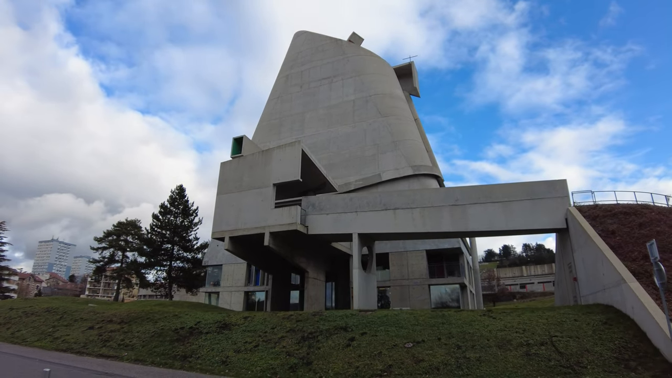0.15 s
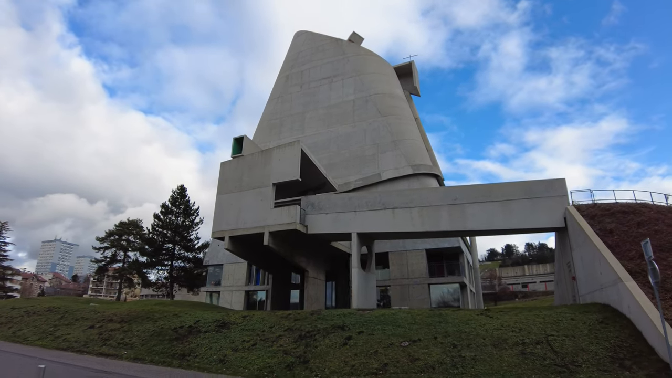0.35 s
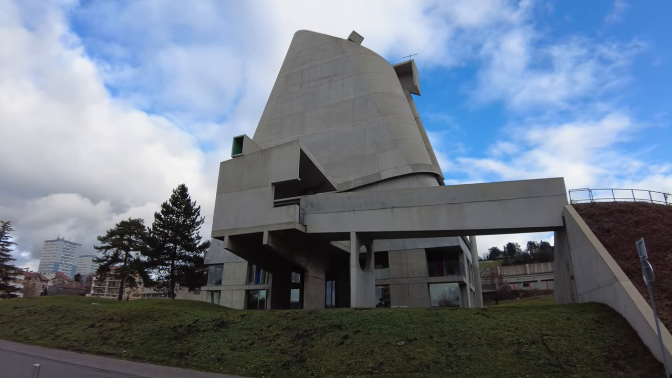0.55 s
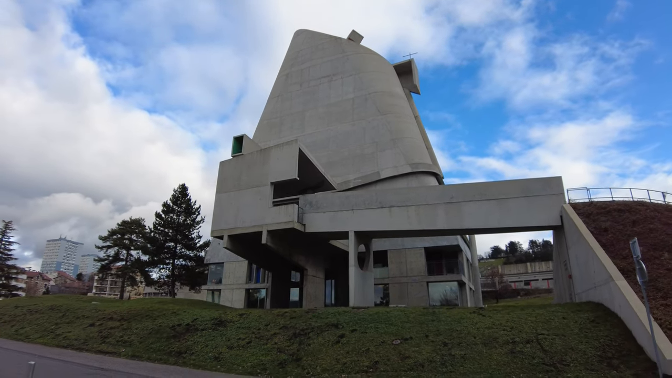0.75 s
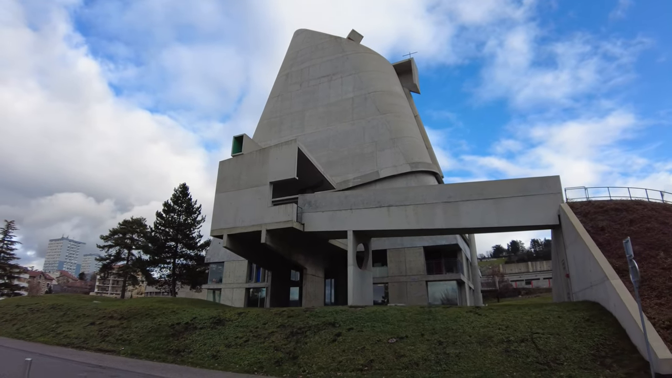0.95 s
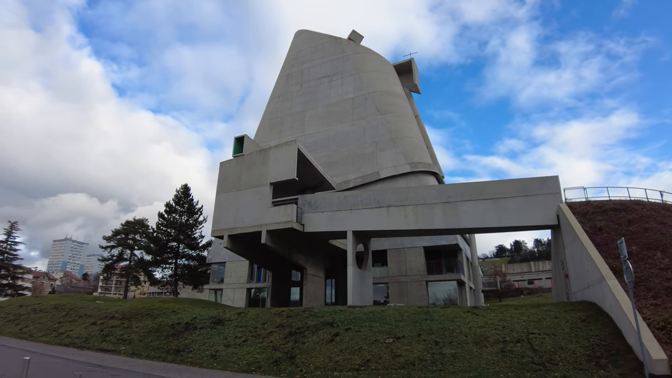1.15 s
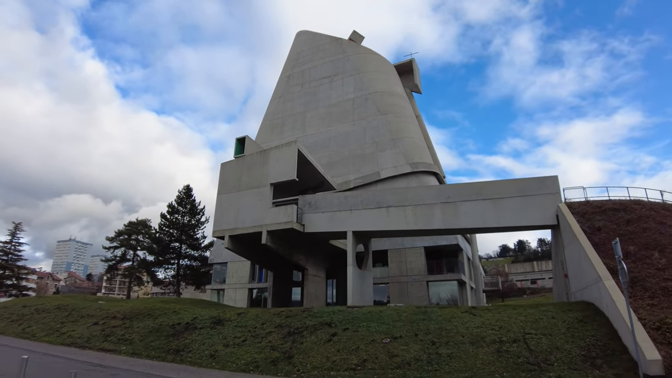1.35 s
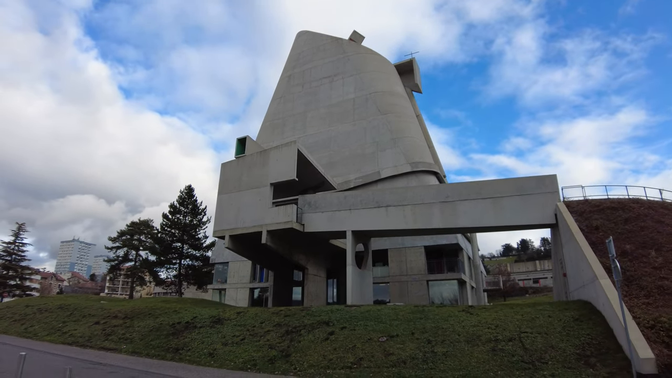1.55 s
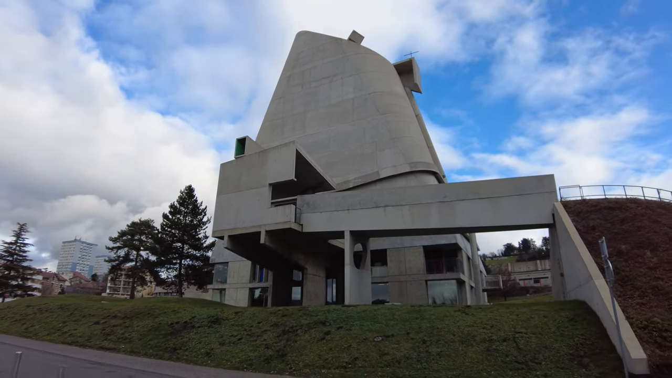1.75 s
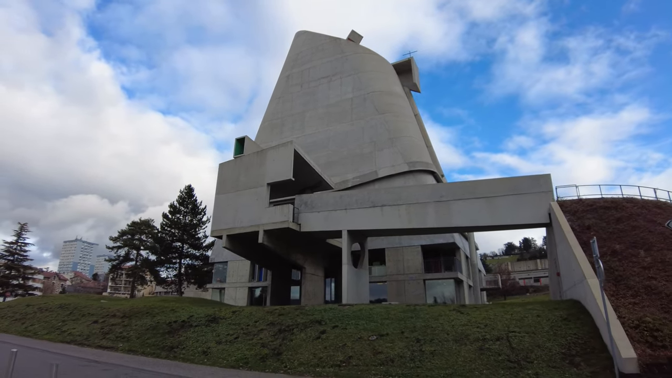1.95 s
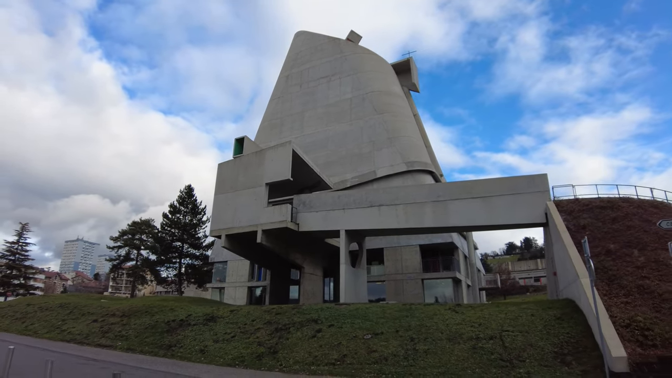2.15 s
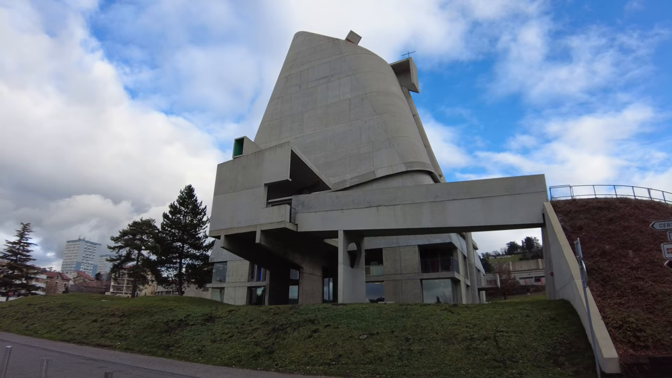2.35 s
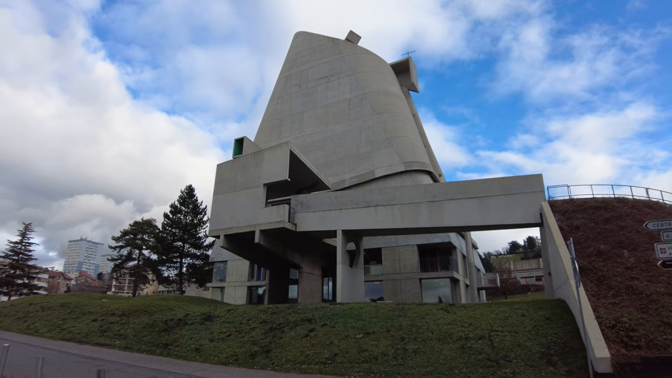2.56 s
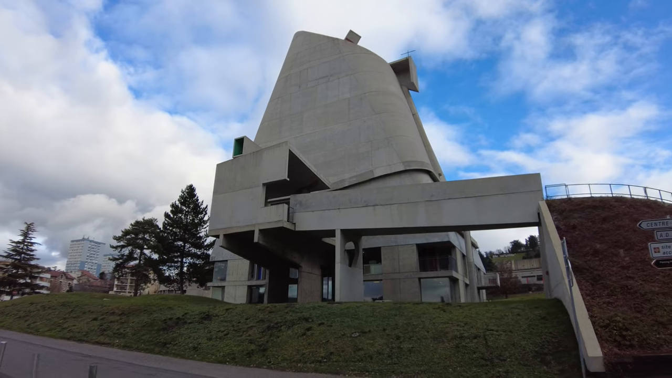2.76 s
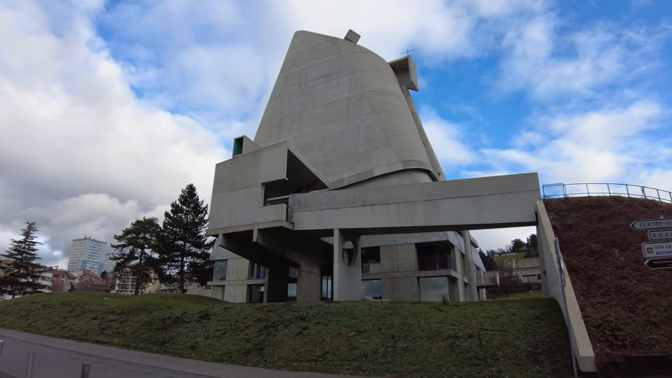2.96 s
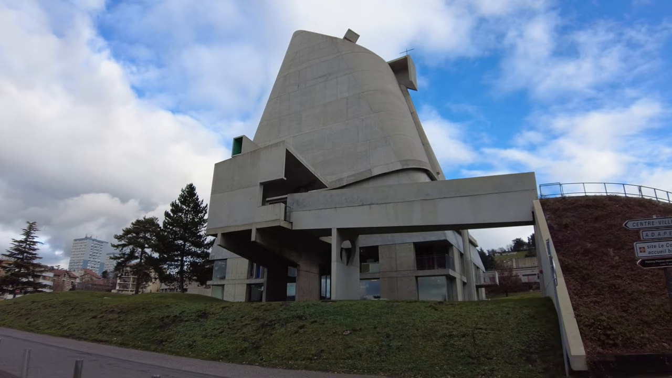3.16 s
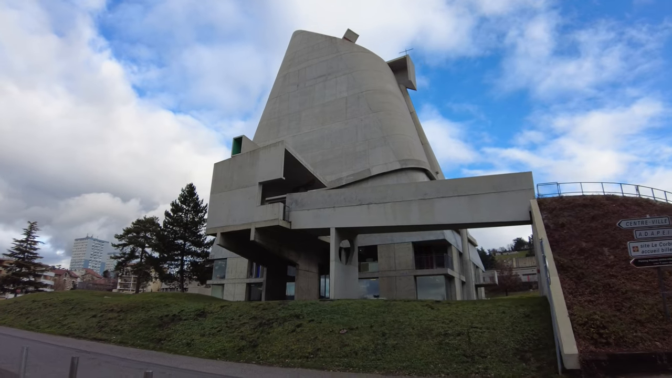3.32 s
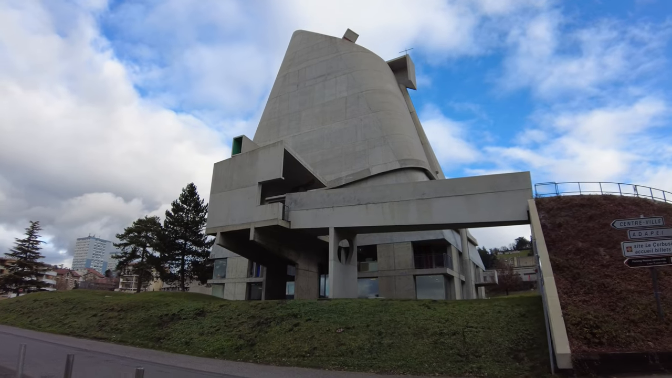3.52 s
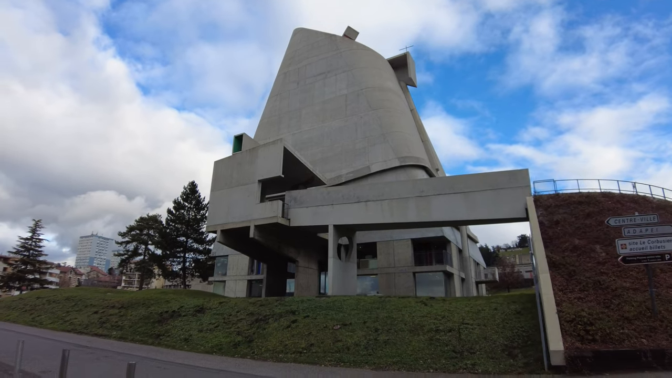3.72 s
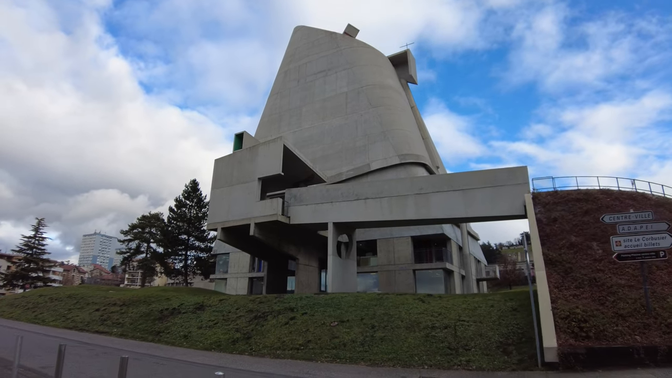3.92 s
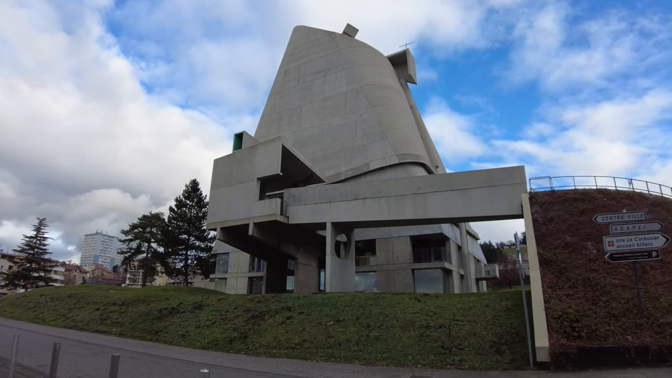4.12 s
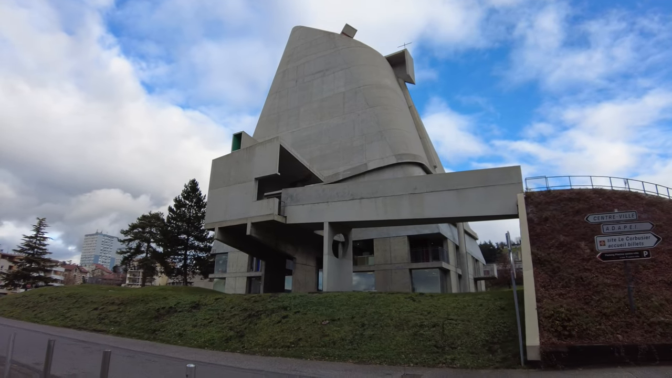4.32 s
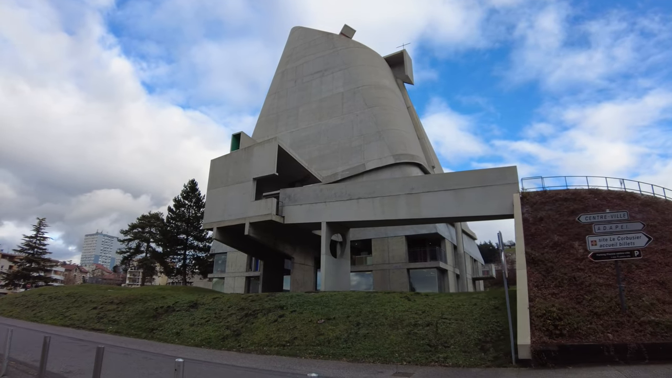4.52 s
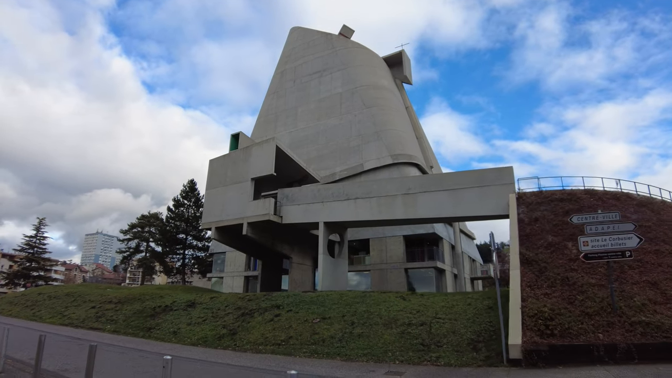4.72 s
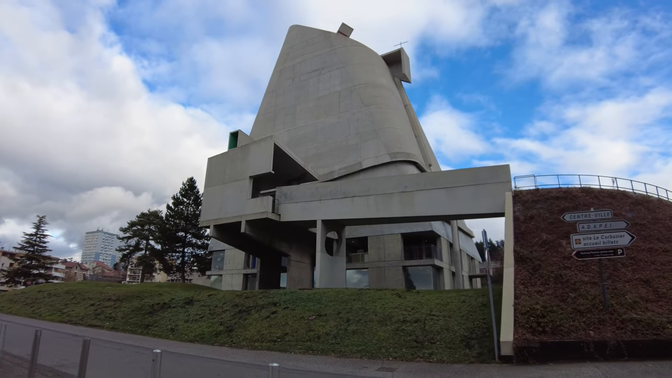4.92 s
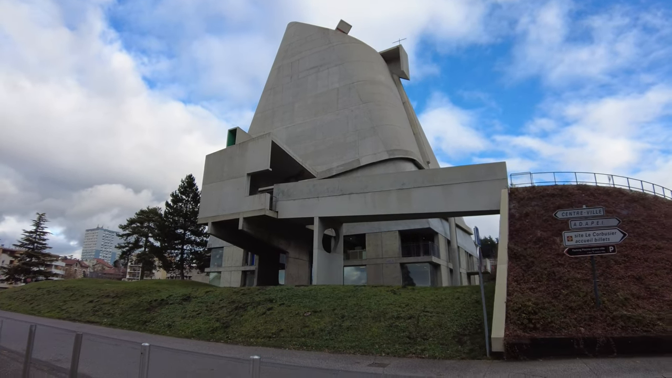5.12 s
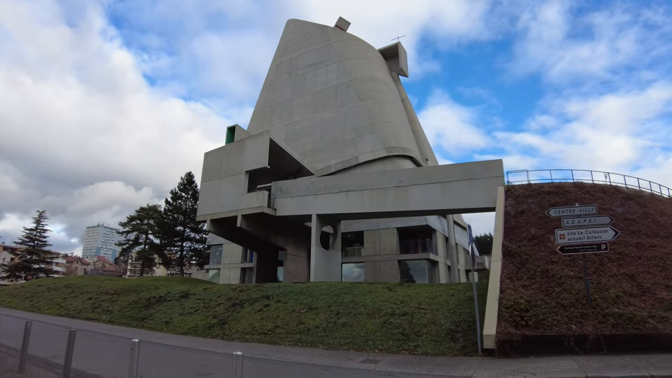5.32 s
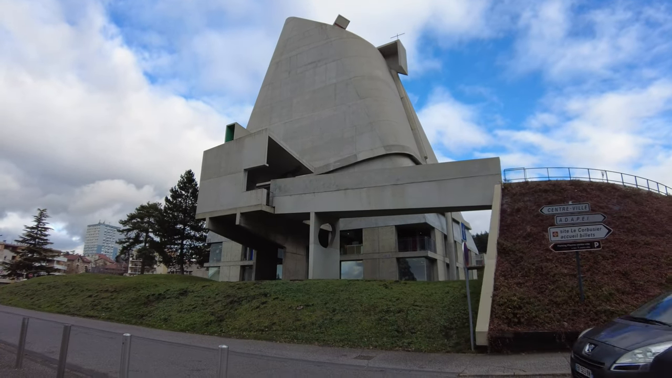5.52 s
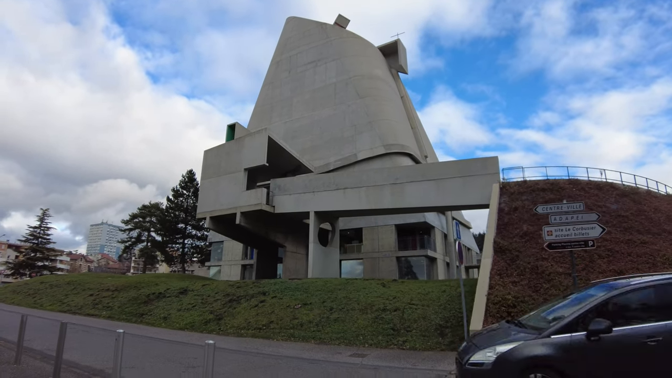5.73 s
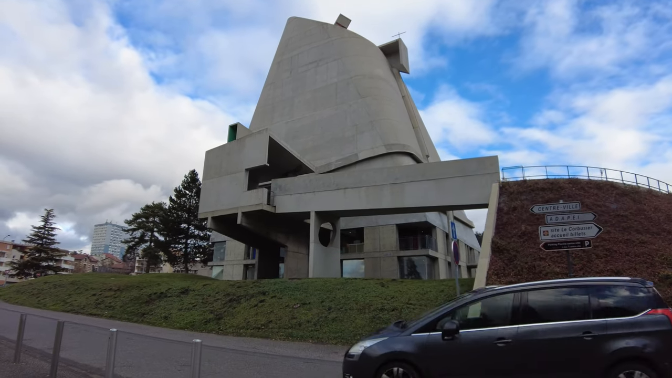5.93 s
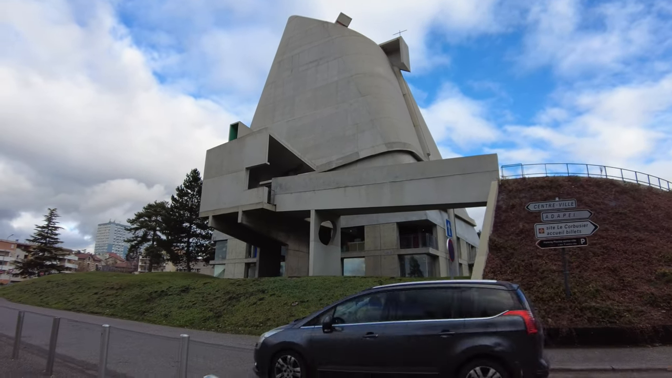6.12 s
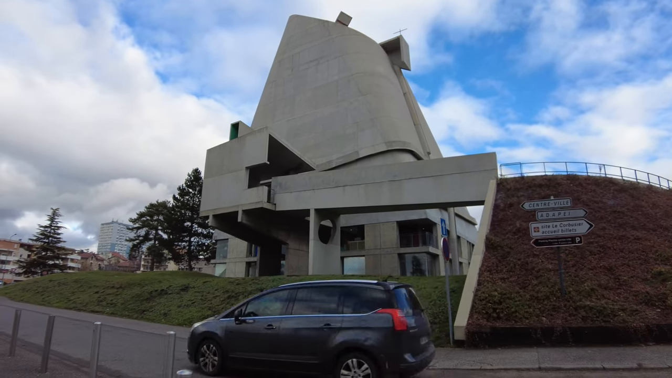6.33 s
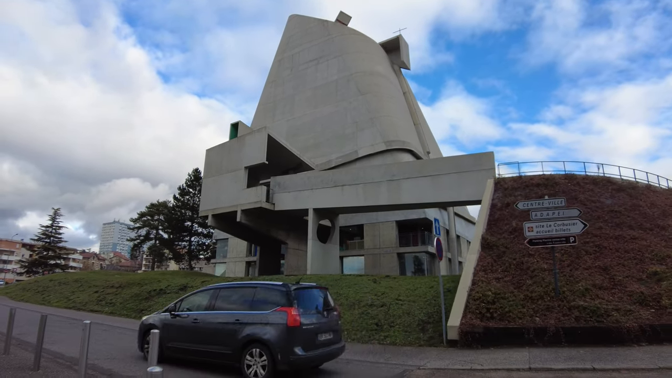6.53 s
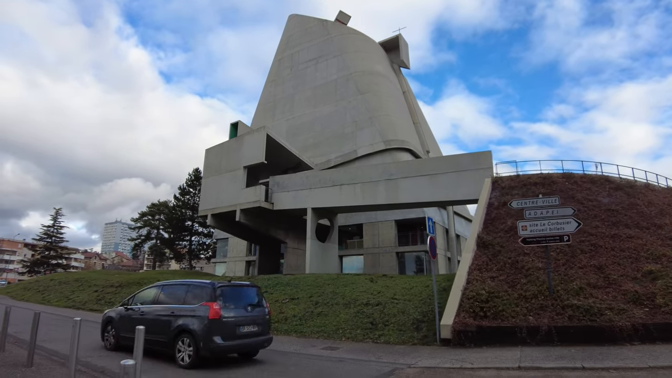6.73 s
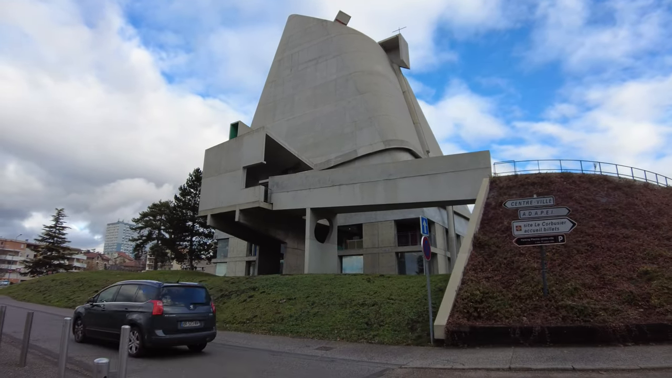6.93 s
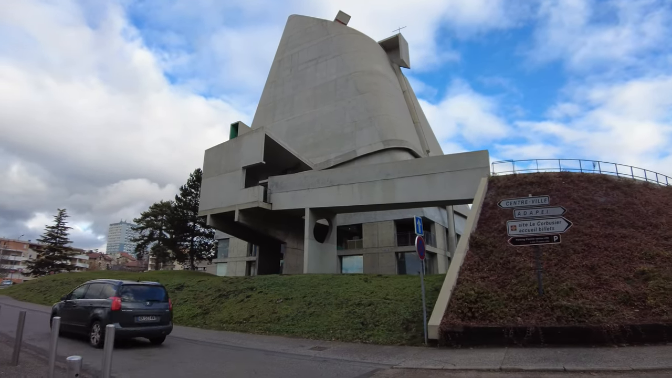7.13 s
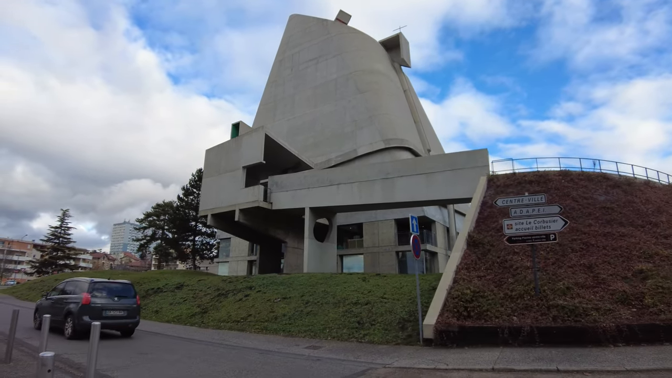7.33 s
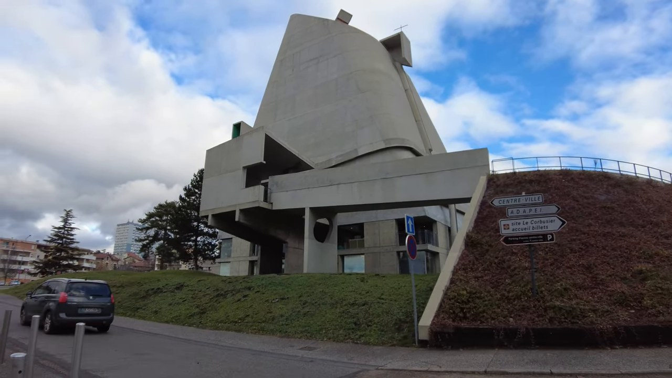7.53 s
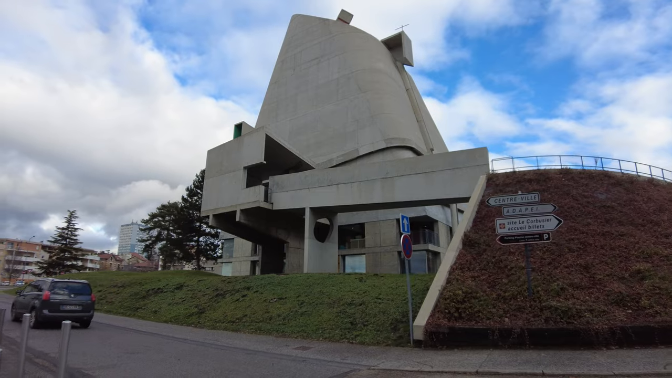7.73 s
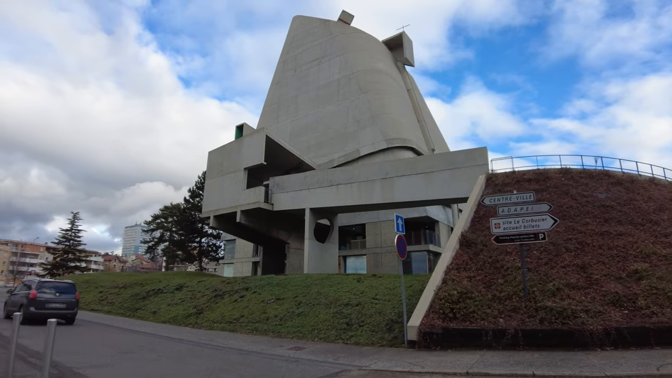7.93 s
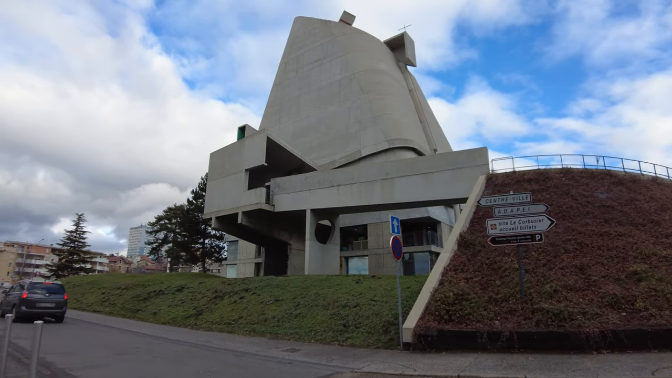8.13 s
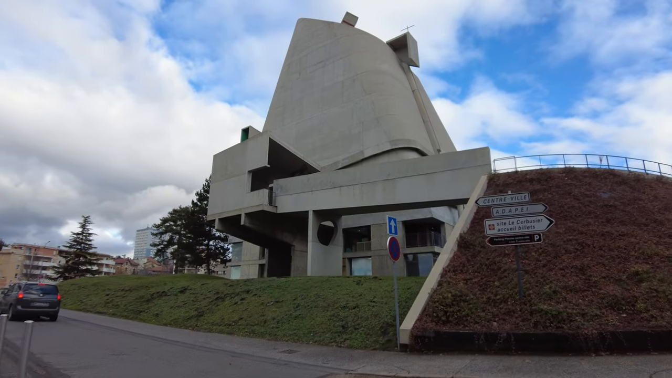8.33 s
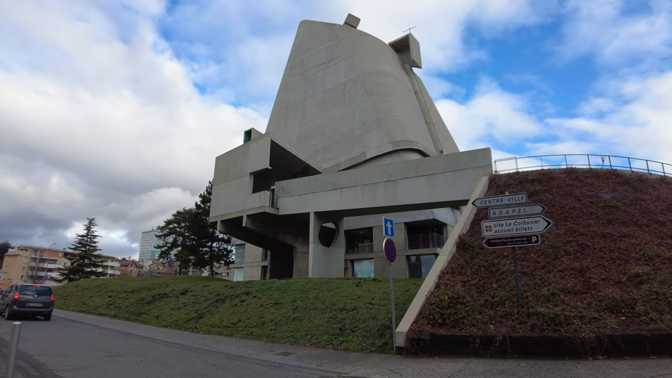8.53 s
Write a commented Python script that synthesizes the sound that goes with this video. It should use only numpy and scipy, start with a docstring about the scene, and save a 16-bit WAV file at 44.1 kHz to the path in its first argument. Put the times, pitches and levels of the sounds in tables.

```python
"""A light wind rumbles on the microphone, a car hums up the street from the right, and a faint wash lies behind.
The engine is a stack of tones whose pitch sinks as the car coasts; the tyres are three bands of coloured noise.
Grit ticks now and then (noise snaps), and a thin whistle (a narrow band of noise) swells three times.
The car passes close by and rolls away to the left, each channel shifted and dulled to set its direction.
Its front and rear wheel each clack over a loose road cover: a knock, a noisy rattle and a low thud."""
import sys
import numpy as np
from scipy import signal
from scipy.fft import rfft, irfft
from scipy.io import wavfile
from scipy.ndimage import uniform_filter1d

SR = 44100
rng = np.random.default_rng(int(sys.argv[2]) if len(sys.argv) > 2 else 0)


def unload_wav(signal):
    """Save mono or channel-first audio to the path in sys.argv[1] as 16-bit WAV at rate SR, clipped to [-1, 1]."""
    wavfile.write(
        sys.argv[1],
        SR,
        np.round(np.clip(np.atleast_2d(signal).T, -1, 1) * 32767).astype(np.int16),
    )


N = 382347  # length in samples
TIME = np.arange(N) / SR  # s, one per sample
BINS = np.fft.rfftfreq(1024, 1 / SR)[:, None]  # Hz, the rows of a short-time spectrum
FRAMES = np.arange(N // 256 + 2) * 256 / SR  # s, the columns of a short-time spectrum


def amp(db):
    """Decibels to gain."""
    return 10 ** (np.asarray(db) / 20)


def unit(x):
    """Scales to rms 1."""
    return x / np.sqrt(np.mean(abs(x) ** 2) + 1e-20)


def curve(rows, x, column=1):
    """Reads one column of a table at x, joining the rows by straight lines."""
    rows = np.array(rows, float)
    return np.interp(x, rows[:, 0], rows[:, column])


def colour(rows, hz, column=1):
    """Gain of a spectrum table on a log-frequency axis; almost silent beyond its ends."""
    rows = np.array(rows, float)
    level_db = np.interp(np.log(hz + 1), np.log(rows[:, 0]), rows[:, column], left=-100, right=-100)
    return amp(level_db)


def add(mix, start_s, sound):
    """Mixes a sound in at its start time."""
    part = mix[round(start_s * SR):][:len(sound)]
    part += sound[:len(part)]


def swell(centre_s, length_s):
    """A smooth bump of height 1 around one moment."""
    return np.exp(-2 * ((TIME - centre_s) / length_s) ** 2)


def drift(t, rate):
    """Slow random wandering of rms 1, made of 16 sines no faster than rate (Hz)."""
    speeds_hz = rate * rng.uniform(0.0967, 1, size=16)
    return unit(sum(np.sin(2 * np.pi * (f * t + rng.random())) for f in speeds_hz))


def shaped(gain, size):
    """Noise of rms 1 with the spectrum gain(hz)."""
    spectrum = rfft(rng.standard_normal(size)) * gain(np.fft.rfftfreq(size, 1 / SR))
    return unit(irfft(spectrum, size))


def speckle():
    """Short-time spectra of random noise."""
    real, imaginary = rng.standard_normal((2, len(BINS), len(FRAMES)))
    return real + 1j * imaginary


def to_sound(spectra):
    """Short-time spectra to samples."""
    return signal.istft(spectra, nperseg=1024, noverlap=768)[1][..., :N]


# lead of the nearer channel at each pitch, as the recorder widens the bass:
# pitch_hz, lead_s from far right, lead_s from far left
STEREO_LEAD = [(300, 0.00057, 0.00065), (800, 0.000605, 0.00057), (1204.5, 0.0006, 0.00068),
               (1206, 0.00017, 0.0002), (1490, 0.00015, 0.00011), (2110, 0.00016, 0.00014),
               (2400, 0.00011, 0.00015), (2730, 0.00013, 0.00012), (3800, 0.00016, 0.000053),
               (7000, 0.000146, 0.00003), (8300, 0.00012, 0.000028)]


def from_side(spectra, side, split_hz=1200, shade_db=2.5):
    """The nearer channel leads, by more in the bass; above the split it also gains treble over the other."""
    lead_s = side * np.where(side < 0, curve(STEREO_LEAD, BINS), curve(STEREO_LEAD, BINS, column=2))
    treble_db = shade_db * side * np.clip(BINS / split_hz - 1, 0, 1)
    # each channel takes half of the difference
    half = np.exp(1j * np.pi * BINS * lead_s) * amp(treble_db / 2)
    return to_sound(spectra * np.array([half, 1 / half]))


def placed(x, side):
    """Sets a mono sound to one side."""
    spectra = signal.stft(x, nperseg=1024, noverlap=768)[2][:, :len(FRAMES)]
    return from_side(spectra, side)


# sides run from -1 (far right) to +1 (far left); the car swings fastest as it crosses in front
FROM_SIDE, TO_SIDE, CROSSING_S, SWING_S = -0.965, 0.64, 6.2, 0.43


def gone_by(t):
    """How far the car's direction has swung, from 0 (far up the street) to 1 (far down it)."""
    return (1 + np.sin(np.arctan((t - CROSSING_S) / SWING_S))) / 2


def car_side():
    """Where the car is in each frame, from right to left."""
    return FROM_SIDE + (TO_SIDE - FROM_SIDE) * gone_by(FRAMES)


# how each part of the car swells and fades: peak_db, nearest_s, passing_s,
# front_db and rear_db lost per doubling of distance, before and after it is nearest
PASS_BY = { "firing": (-31.9, 5.85, 1.1, 7.9, 4.9), "octave": (-33.4, 5.7, 0.48, 9.1, 6.8),
           "engine drone": (-37.8, 5.3, 1.2, 5.1, 13), "tyre drone": (-34.6, 5.85, 0.9, 8.6, 8.5),
           "roar": (-35.3, 5.78, 0.72, 5.8, 6.5), "hiss": (-50.7, 5.85, 0.68, 5.7, 8.6)}


def passing(part):
    """Level in dB of one part of the car: it falls with distance, at one rate in front and another behind."""
    peak_db, nearest_s, passing_s, front_db, rear_db = PASS_BY[part]
    doublings = np.log2(np.hypot(1, (TIME - nearest_s) / passing_s))
    return peak_db - doublings * np.where(TIME < nearest_s, front_db, rear_db)


# colour of the wind rumble: pitch_hz, relative level_db (per Hz)
WIND_COLOUR = [(5, -10), (18, -5.5), (32, 2.5), (50, -2.5), (80, -1.5), (130, -22.5), (300, -22),
               (900, -70)]
# puffs of air in the car's wake: centre_s, level_db, length_s
WAKE_PUFFS = [(6.04, -32, 0.16), (6.48, -32.5, 0.24), (7.3, -40, 0.3), (8.5, -43, 0.45)]


def wind(breeze_db=-47.5, lumpy_db=1.0, apart_db=-18):
    """A steady breeze and the car's wake rumble, mostly shared, with small eddies at each microphone port."""
    shared, left, right = (shaped(lambda hz: colour(WIND_COLOUR, hz), size=N) for _ in range(3))
    rumble = shared + amp(apart_db) * np.array([left, right])
    puff_power = sum((amp(db) * swell(s, length)) ** 2 for s, db, length in WAKE_PUFFS)
    power = amp(breeze_db) ** 2 + puff_power
    return rumble * np.sqrt(power) * amp(lumpy_db * drift(TIME, rate=5.8))


# engine speed, sinking as the car coasts: time_s, firing_hz
FIRING_RATE = [(0, 77), (1.8, 75.8), (2.75, 71.2), (3.8, 66.2), (5.25, 61.2), (6.2, 58.8), (6.85, 58.7),
               (7.85, 56.9), (8.67, 52.9)]
# the firing tone dips while the car is far off, and briefly just after it has passed:
# centre_s, depth_db, length_s
FIRING_DIPS = [(0.9, -5, 1.3), (6.72, -9, 0.5)]
# where the engine's hollow drone rings: pitch_hz, width_hz, relative level_db
DRONE_RINGS = [(250.8, 34, 0.5), (195, 27, -10), (297, 54, -13.5), (426, 170, -23)]
# unevenness of the cylinders, repeating with each firing order:
# relative level_db of whole, quarter, half and three-quarter orders
CYLINDER_LEVELS = [0, -2, -2.5, -1]


def engine(waver=0.001, rough=0.084, flutter_db=2.2, lope_db=-13.5, build_db=-5.5, build_s=0.8):
    """Exhaust firing tone and octave; four unequal cylinders add quarter orders that sweep through the drone."""
    firing_hz = curve(FIRING_RATE, TIME) * (1 + waver * drift(TIME, rate=6))
    turn = 2 * np.pi * np.cumsum(firing_hz) / SR

    def order(k, wander=0):
        """A tone of rms 1 at k times the firing rate; shifting sound paths let its phase wander."""
        shift = np.interp(TIME, FRAMES, wander * drift(FRAMES, rate=2.5))
        return np.sqrt(2) * np.sin(k * turn + shift + rng.uniform(0, 2 * np.pi))

    # an uneven beat that comes up as the car goes by
    lope = amp(lope_db) * gone_by(TIME) * (order(1 / 2) + order(3 / 2))
    firing_db = passing("firing") + sum(db * swell(s, length) for s, db, length in FIRING_DIPS)
    hum = amp(firing_db) * (order(1) + lope) + amp(passing("octave")) * order(2)

    drone = np.zeros(N)
    for quarters in range(10, 33):
        k = quarters / len(CYLINDER_LEVELS)
        order_hz = k * curve(FIRING_RATE, FRAMES)
        # each order grows louder as its pitch nears a ringing place
        ringing = sum(amp(db) / (1 + (2 * (order_hz - f) / width) ** 2) for f, width, db in DRONE_RINGS)
        uneven_db = CYLINDER_LEVELS[quarters % len(CYLINDER_LEVELS)]
        size = ringing * amp(flutter_db * drift(FRAMES, rate=3) + uneven_db)
        drone += np.interp(TIME, FRAMES, size) * order(k, wander=0.36)
    # the drone is still building as the car comes into earshot
    drone_db = passing("engine drone") + build_db * swell(0, build_s)
    rough_hum = hum * (1 + rough * drift(TIME, rate=14))
    return placed(rough_hum + unit(drone) * amp(drone_db), car_side())


def road_echo(share=0.1, delay_s=0.00158, closest_s=6.216, passing_s=0.78):
    """The bounce off the road lags most when the car is closest: a comb that sweeps down and up again."""
    delay = delay_s / np.sqrt(1 + ((FRAMES - closest_s) / passing_s) ** 2)
    return abs(1 + share * np.exp(-BINS / 6000) * np.exp(-2j * np.pi * BINS * delay))


# how alike the two channels are before closeness adds to it: pitch_hz, likeness (0 to 1)
CHANNEL_LIKENESS = [(100, 0.98), (500, 1), (900, 0.99), (1500, 0.91), (2900, 0.83), (3800, 0), (6000, 0.36),
                    (7200, 0.7), (8500, 0.42), (15000, 0)]


def rolling(spectrum, level_db, patchy_db, streaky_db, closest_s=5.6, passing_s=0.97, direct=0.067):
    """One band of tyre noise: its colour turns from front to flank to rear, and it is more direct when close."""
    near = np.exp(-((FRAMES - closest_s) / passing_s) ** 2)
    far = np.where(FRAMES < closest_s, colour(spectrum, BINS), colour(spectrum, BINS, column=3))
    abreast = colour(spectrum, BINS, column=2)
    gain = far ** (1 - near) * abreast ** near * road_echo()
    gain = gain / np.sqrt((gain ** 2).sum(0))
    # random unevenness of level: short wide patches and long narrow streaks
    patches = unit(uniform_filter1d(uniform_filter1d(speckle().real, size=14, axis=0), size=8, axis=1))
    streaks = unit(uniform_filter1d(uniform_filter1d(speckle().real, size=3, axis=0), size=60, axis=1))
    texture = amp(patchy_db * patches + streaky_db * streaks)
    same = np.clip(1 - (1 - curve(CHANNEL_LIKENESS, BINS)) * (1 - direct * near), 0, 1)
    left = speckle()
    right = same * left + np.sqrt(1 - same ** 2) * speckle()
    noise = np.array([left, right])
    return unit(from_side(noise * gain * texture, car_side())) * amp(level_db)


# colours of the low, middle and high tyre noise:
# pitch_hz, then relative level_db (per Hz) from the front, abreast and from behind
TYRE_DRONE = [(69, -17, -11, -22), (100, 0, 9.5, -1), (160, -2, -12, 1), (205, -6, 4, 1),
              (260, 2.5, -0.5, 0), (314, -4, 3.5, -5), (438, -6.5, -15, -1), (533, -19, -11, -7),
              (750, -52, -35, -35)]
TYRE_ROAR = [(378, -33, -33, -42), (556, -9, -13.5, 0.5), (725, -0.5, -2.5, -1.5), (960, 1, -2, 2),
             (1210, -5, -7, 1), (1565, -5.5, -12.5, -0.5), (1790, -7.5, -10, -4.5), (2180, -14.5, -18, -12),
             (2480, -12.5, -20.5, -10.5), (3230, -15.5, -20.5, -17), (3500, -21.5, -25, -39),
             (5000, -60, -60, -60)]
TYRE_HISS = [(2400, -25, -30, -30), (3500, -0.5, -8, 3), (4840, -2.5, -6.5, -1.5), (7540, -9.5, -12, -10.5),
             (9860, -15.5, -17.5, -13.5), (13000, -19.5, -22, -15.5), (16000, -23, -23, -21)]


def tyres():
    """Bodies drone, treads roar, and air squeezed from the grooves hisses with a fine grain."""
    drone = rolling(TYRE_DRONE, passing("tyre drone"), patchy_db=0.5, streaky_db=0.0)
    roar = rolling(TYRE_ROAR, passing("roar"), patchy_db=0.86, streaky_db=1.35)
    hiss = rolling(TYRE_HISS, passing("hiss"), patchy_db=1.9, streaky_db=0.3)
    # quick level flicker, in dB
    grain = shaped(lambda hz: 1 / (1 + hz / 150), size=N)
    return drone + roar * amp(0.54 * grain) + hiss * amp(1.0 * grain)


# colour of the faint background wash: pitch_hz, relative level_db (per Hz)
WASH_COLOUR = [(300, -10), (440, 2), (650, -5), (850, -7), (1150, 1), (1650, -5), (2150, -1), (2500, -8),
               (3600, -13), (6000, -27), (10000, -36), (15000, -44)]


def background_wash(level_db=-56.3, loudest_s=1.0, length_s=2.3):
    """A faint background wash of coloured noise on the right that swells and sinks early."""
    wash = shaped(lambda hz: colour(WASH_COLOUR, hz), size=N)
    return placed(amp(level_db) * swell(loudest_s, length_s) * wash, FROM_SIDE)


def mic_hiss(level_db=-85):
    """Faint, even self-noise of each microphone."""
    return amp(level_db) * rng.standard_normal((2, N))


# the clearest ticks of grit: start_s, level_db (before halving and fading), pitch_hz, spread_octaves
GRIT_TICKS = [(.451, -47, 5000, 0.29), (0.4958, -39.5, 2700, 0.62), (1.626, -47, 5200, 0.27),
              (2.278, -48, 4500, 0.36), (2.78, -47.5, 5540, 0.26), (3.445, -42, 3000, 0.47),
              (3.935, -45, 5140, 0.27), (6.973, -46, 8600, 0.11), (7.039, -51, 11000, 0.44),
              (7.229, -40, 5010, 0.96), (7.394, -50, 5000, 0.24), (7.845, -54, 6500, 0.54),
              (7.954, -53, 4500, 0.28), (8.053, -53, 5190, 0.38)]


def grit(decay_s=0.0034):
    """Small stones snap with a brief, high tick: a band of noise that dies away at once."""
    out = np.zeros(N)
    t = np.arange(SR // 20) / SR
    for start_s, level_db, pitch_hz, spread in GRIT_TICKS:
        snap = shaped(lambda hz: np.exp(-0.5 * (np.log2((hz + 1) / pitch_hz) / spread) ** 2), size=len(t))
        add(out, start_s, amp(level_db) * snap / 2 * np.exp(-t / decay_s))
    return out


# faint swells of a thin whistle, like a brushing brake: centre_s, level_db, length_s
WHISTLE_SWELLS = [(1.738, -61.5, 0.2), (2.78, -62, 0.32), (3.9, -62, .35)]


def whistle(pitch_hz=2550, width_hz=50):
    """A narrow, fuzzy tone that swells about once a second as the car nears."""
    tone = shaped(lambda hz: np.exp(-0.5 * ((hz - pitch_hz) / width_hz) ** 2), size=N)
    level = sum(amp(db) * swell(s, length) for s, db, length in WHISTLE_SWELLS)
    return placed(tone * level, car_side())


COVER_SIDE = -0.16  # the loose cover lies almost straight ahead
# wheels on the loose cover: start_s, knock_db, knock_hz,
# rattle_db, rattle_decay_s, treble_db (per octave), thud_db
COVER_CLACKS = [(6.0489, -13.5, 610.7, -22, 0.011, -4.5, -20), (6.0769, -7.5, 880, -19, 0.01, -1, -25),
                (6.4304, -12.5, 441.7, -21, 0.0059, -3.5, -21), (6.4379, -6, 750, -18.5, 0.012, -1.5, -36)]
# what the cover and its frame rattle with: pitch_hz, relative level_db (per Hz)
RATTLE_COLOUR = [(120, -3.5), (250, 4), (400, -4.5), (800, -7), (1150, -4), (1650, -16), (2300, -11.5),
                 (3050, -9.5), (3700, -16), (6000, -17), (8000, -19.5), (11000, -27.5), (16000, -33)]


def cover(thud_hz=48, thud_s=0.02, tail_db=-21, tail_s=0.046, scatter=0.37):
    """Each wheel tips the cover, which slams back: a knock, a short rattle and a thud in the ground."""
    direct, spread = np.zeros(N), np.zeros((2, N))
    lead_s = 0.004  # room for the knock to rise before the hit
    t = np.arange(SR // 4) / SR - lead_s
    after = np.maximum(t, 0)
    for start_s, knock_db, knock_hz, rattle_db, decay_s, treble_db, thud_db in COVER_CLACKS:
        # the knock is one short pulse with a dip on either side
        u = (np.pi * knock_hz * t) ** 2
        knock = amp(knock_db) * (1 - 2 * u) * np.exp(-u)
        thud = amp(thud_db) * -np.sin(2 * np.pi * thud_hz * after) * np.exp(-after / thud_s)
        rise = np.clip(1 + t / 0.0017, 0, 1)
        fall = np.exp(-after / decay_s) + amp(tail_db) * np.exp(-after / tail_s)
        fade = amp(rattle_db) * rise * fall

        def rattle_gain(hz):
            """The rattle's colour, tilted for this clack."""
            return colour(RATTLE_COLOUR, hz) * amp(treble_db * np.log2(1 + hz / 800))

        rattles = [fade * shaped(rattle_gain, size=len(t)) for _ in range(3)]
        add(direct, start_s - lead_s, knock + thud + rattles[0])
        # a separate, weaker rattle in each channel widens the clack
        for channel, rattle in zip(spread, rattles[1:]):
            add(channel, start_s - lead_s, scatter * rattle)
    return placed(direct, COVER_SIDE) + spread


def scene():
    """The car, the road, the wind and the background wash, with the microphones' own hiss."""
    return tyres() + engine() + whistle() + cover() + grit() + wind() + background_wash() + mic_hiss()


def record(dry, edge_hz=15850):
    """The recorder's band limit: a steep low-pass filter removes the highest treble."""
    low_pass = signal.firwin(511, edge_hz, window=("kaiser", 9), fs=SR)
    return signal.oaconvolve(dry, low_pass[None], "same", axes=1)


dry = scene()
out = record(dry)
unload_wav(out)
```